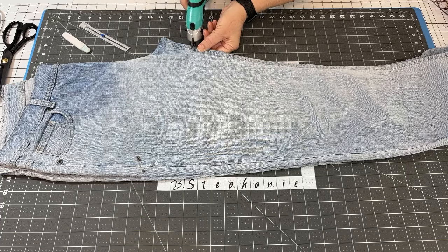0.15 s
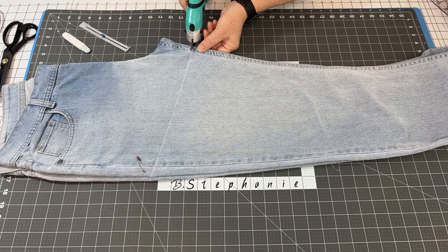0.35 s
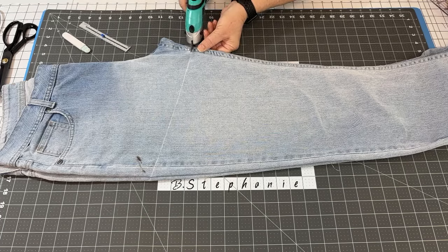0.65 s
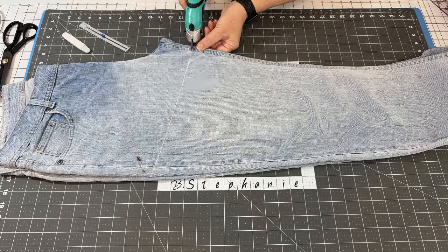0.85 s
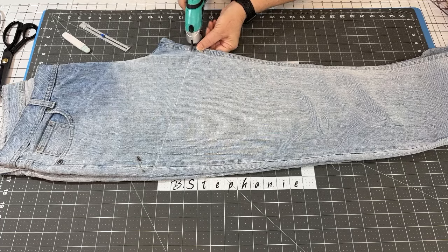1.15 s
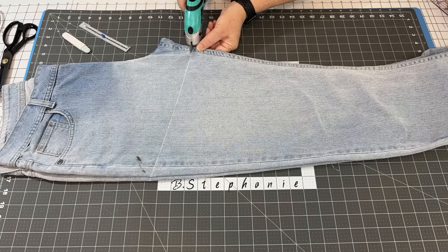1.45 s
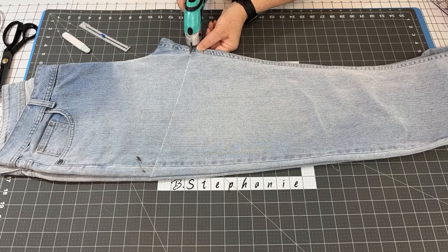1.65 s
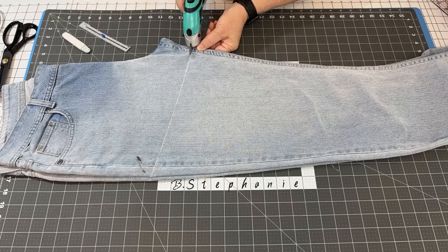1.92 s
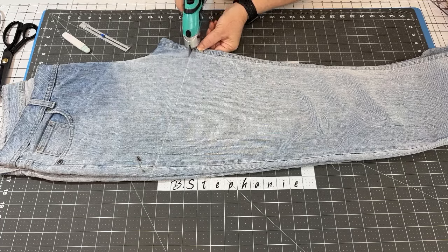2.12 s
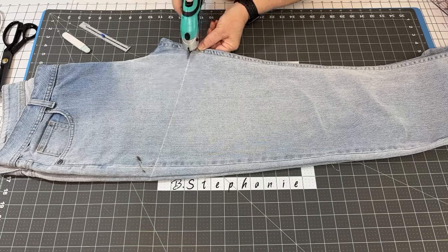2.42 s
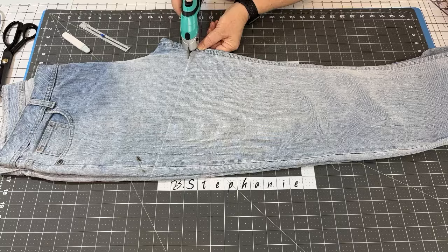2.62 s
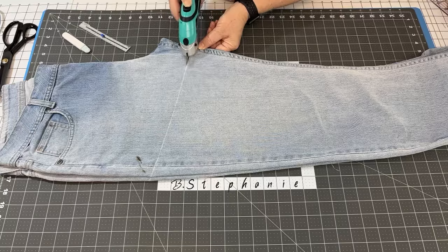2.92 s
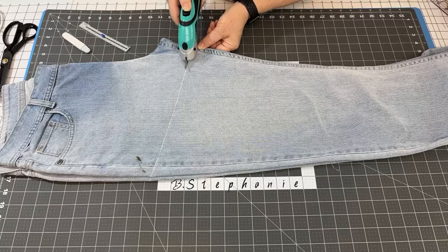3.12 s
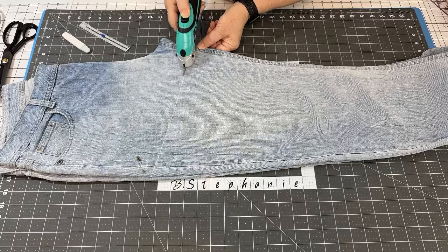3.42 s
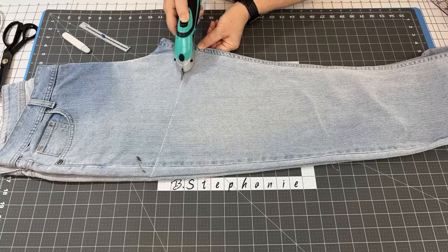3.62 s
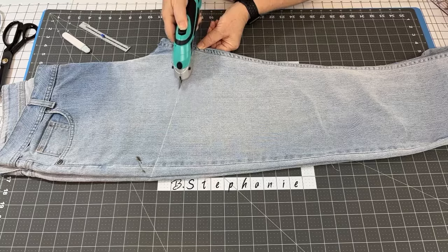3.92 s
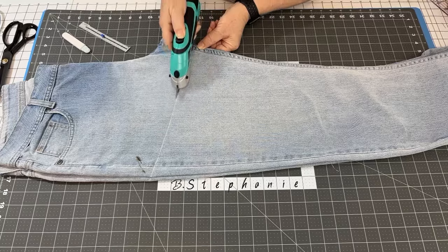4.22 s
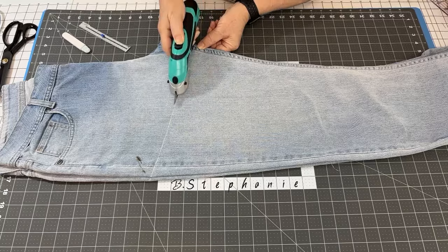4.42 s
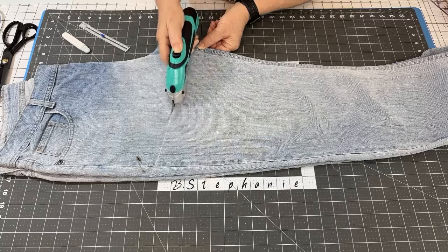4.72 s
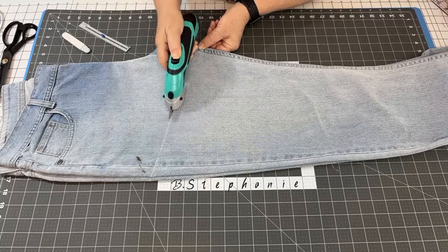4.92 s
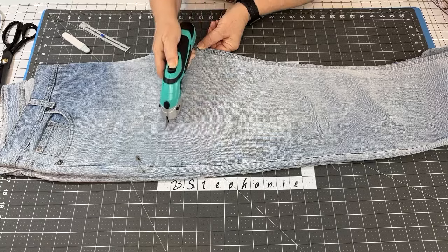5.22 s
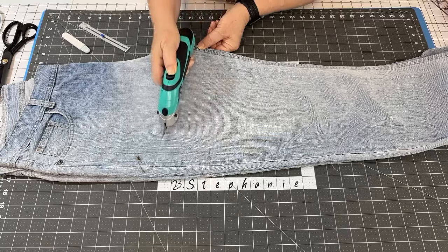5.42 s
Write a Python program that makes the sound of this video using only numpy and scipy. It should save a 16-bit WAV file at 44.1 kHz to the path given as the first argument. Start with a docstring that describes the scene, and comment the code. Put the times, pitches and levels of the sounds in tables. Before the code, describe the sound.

A handheld motor cutter buzzes and rattles through a jeans seam, then runs on with a rougher, hissing rasp across flatter cloth.

```python
"""A table in a quiet room: small cordless electric scissors cut denim, heard by one microphone.
A low room rumble lies behind, and a short room tail follows the clatter, weaker than the direct sound.
A motor swings the blade once a turn: the housing hums as sines on orders of the shaft, the linkage knocks as
filtered clicks at slowly sliding places in the turn, and blade and cloth rasp as noise that flares after contacts.
The thick seam slows the motor and cleans the tone; pings, snaps and scrapes are shaped noise and pulses."""
import sys
import numpy as np
from scipy import signal
from scipy.fft import rfft, irfft
from scipy.io import wavfile
from scipy.ndimage import uniform_filter1d

SR = 44100
rng = np.random.default_rng(int(sys.argv[2]) if len(sys.argv) > 2 else 0)


def to_wav(s):
    """Save 16-bit WAV."""
    ch = np.atleast_2d(s).T  # columns
    pcm = np.round(np.clip(ch, -1, 1) * 32767)  # PCM
    wavfile.write(sys.argv[1], SR, pcm.astype(np.int16))


N = 245195

# spectrum of the low room noise: pitch_hz, relative_level_db
RUMBLE_COLOUR = [(12, -22), (22, 3), (33, -7), (60, -1.5), (104, 1), (150, -2.5), (172, -15), (199, -7.5),
                 (280, -27.5), (360, -31)]
# shaft speed, slowed by the seam and freed when the blade backs off: time_s, speed_turns_per_s
SHAFT_SPEED = [(0.0, 127.1), (0.05, 134.7), (0.09, 152.7), (0.23, 158.6), (0.39, 154.3), (0.47, 149.1),
               (0.85, 152.1), (0.91, 161.8), (1.04, 162.2), (1.12, 153.1), (1.28, 149.3), (1.48, 152.7),
               (1.75, 152.5), (1.91, 152), (2.09, 152.8), (2.18, 156.6), (2.36, 161.8), (2.43, 160.5),
               (2.54, 164.9), (2.69, 164.5), (2.78, 158.8), (2.89, 161.2), (3.08, 159.3), (4.1, 158.3),
               (4.35, 160.6), (4.8, 161.6), (5.02, 161.5), (5.2, 160.3), (5.56, 161.1)]
# where the blade works: time_s, place (0 short of the cloth, 1 in the seam, 2 backed off,
# 3 entering flat cloth, 4 far across it; values between two places blend them)
BLADE_PLACE = [(0, 0.84), (.38, 0.59), (.47, 1.66), (.85, 2.57), (.9, 2.27), (1.04, 2.5), (1.1, 1.34),
               (2.12, 0.98), (2.3, 2.77), (2.45, 2.63), (2.5, 2.27), (2.68, 2.2), (2.74, 2.58), (4.1, 3.2),
               (4.5, 3.74), (5.56, 4.28)]
# effort of the cut: time_s, housing_hum_db, clatter_of_linkage_and_blade_db (before the room),
# rasp_share of the clatter's power (0-1)
WORK_LEVELS = [(0.0, -44, -32, 1), (0.08, -25, -26.5, 0.4), (0.14, -23, -26.5, 0), (0.24, -24, -25.5, 0),
               (0.36, -26.5, -25.5, 0.6), (0.45, -26, -25, 0.12), (0.79, -23.5, -23, 0.13),
               (0.89, -28.5, -28.5, .3), (1.02, -27.5, -27, .3), (1.1, -23, -24, 0.21),
               (1.3, -25.5, -24, .12), (1.57, -23.5, -23.5, .03), (2.0, -24, -24, 0.09),
               (2.2, -26, -23.5, 0.28), (2.42, -26, -25.5, 0.7), (2.5, -30.5, -26.5, .3),
               (2.64, -31.5, -24, 0.23), (2.74, -27.5, -24.5, .75), (2.95, -25.5, -24.5, 0.22),
               (3.3, -27, -24, 0.81), (4.1, -27.5, -23, 0.87), (4.5, -29.5, -23.5, 1),
               (4.8, -27.5, -23.5, 0.71), (5.26, -27.5, -22.5, 0.8), (5.38, -30.5, -24, 0.67),
               (5.56, -27.5, -22.5, 0.88)]
# balance of the housing hum: shaft_order, then relative_level_db at each of the five blade places
HUM_ORDERS = [(2, -18, -17.5, -16, -21.5, -25.5), (3, -17, -6, -14, -7.5, -13),
              (4, -5, -11.5, -6, -9, -10.5), (5, -26, -2, -1, -15.5, -14), (6, 2, -11, -5, -11, -13),
              (7, -24, -5.5, -8.5, -11.5, -15), (8, -12, -14.5, -11.5, -13.5, -9),
              (9, -10, -9.5, -9.5, -4.5, -16.5), (10, -6, -16, -5, -33.5, -29),
              (11, -15, -13.5, -10, -17, -16.5), (12, -5, -17, -11, -12.5, -9.5),
              (13, -32, -13.5, -14, -7.5, -11), (14, -33, -9, -11, -11.5, -13),
              (15, -27, -15.5, -12.5, -24, -13), (16, -32, -17.5, -17, -13, -10),
              (17, -29, -16.5, -7.5, -24, -17), (18, -13, -15, -20.5, -19.5, -10.5),
              (19, -24, -18.5, -16, -13, -10), (20, -1, -21, -6.5, -18, -6)]
# single orders that sing out for a while: start_s, end_s, shaft_order, level_db
SINGING_ORDERS = [(0.16, 0.26, 8, -26.5), (0.305, 0.438, 5, -28.5), (0.449, 0.619, 11, -32),
                  (.7, 0.883, 7, -28.5), (0.701, 0.837, 21, -37), (0.696, 0.817, 28, -33),
                  (1.15, 1.27, 7, -29.5), (1.27, 1.42, 21, -34), (1.516, 2.092, 27, -35),
                  (1.7, 2.106, 28, -34), (1.75, 2.066, 29, -34), (1.791, 2.089, 30, -31),
                  (2.01, 2.299, 6, -32), (2.153, 2.4, 13, -35), (2.55, 2.69, 5, -30),
                  (2.549, 2.742, 8, -33), (2.194, 2.31, 25, -29), (2.55, 2.66, 20, -33),
                  (2.73, 3.416, 9, -29.5), (2.858, 3.01, 25, -31.5), (2.93, 3.111, 6, -32.5),
                  (3.6, 4.361, 8, -32.5), (4.641, 5.17, 19, -32), (4.851, 5.56, 12, -34.5),
                  (5.2, 5.562, 8, -35.5), (5.3, 5.413, 25, -34), (5.329, 5.565, 14, -33.5),
                  (5.33, 5.56, 16, -36)]
# the two blade reversals: place_in_turn (0-1), relative_strength_db
BLADE_REVERSALS = [(.2, -1), (.8, -13)]
# spectrum of a linkage knock: pitch_hz, relative_level_db
KNOCK_COLOUR = [(2400, -20), (3300, -2.5), (3900, -1), (4500, 0), (5200, -3.5), (6000, -5.5), (7000, -4),
                (8300, -8.5), (9000, -14.5), (12000, -15), (15500, -26)]
# spectrum of the cloth scuff: pitch_hz, relative_level_db
SCUFF_COLOUR = [(150, -43), (300, -12.5), (450, -8), (800, 1), (1300, 2), (2100, -7), (2600, -40),
                (4000, -22)]
# spectrum of the blade rasp in the seam: pitch_hz, relative_level_db
RASP_SEAM_COLOUR = [(1500, -23), (2400, -2.5), (3200, 1), (4400, 4), (5500, 1), (8200, -1), (9000, -11.5),
                    (12300, -10), (14000, -16), (15700, -32)]
# spectrum of the blade rasp on flat cloth: pitch_hz, relative_level_db
RASP_FLAT_COLOUR = [(1500, -16), (2400, -2), (3000, 3), (4200, 1.5), (6000, -1), (8400, -3.5), (9000, -12),
                    (12300, -13), (14000, -18), (15700, -22)]
# ping of the unloaded blade until it meets the cloth: time_s, level_db (before the room)
PING_LEVEL = [(0, -35), (.06, -30), (.36, -26), (.44, -52), (5.56, -58)]
# spectrum of a ping: pitch_hz, relative_level_db
PING_COLOUR = [(5500, -17), (7300, -5), (8000, 0.5), (8700, -4), (9300, -24), (12000, -19), (15500, -23)]
# rough scrapes as the blade bites in or pulls free: centre_s, length_s, peak_level_db (before the room)
BLADE_SCRAPES = [(0.043, 0.028, -25.5), (.42, 0.046, -41), (0.867, 0.037, -30), (1.08, 0.067, -37),
                 (2.135, .04, -32), (2.204, 0.027, -34), (2.433, 0.027, -31.5), (2.7, 0.036, -29),
                 (3.08, .03, -38), (5.278, 0.034, -33)]
# spectrum of a scrape: pitch_hz, relative_level_db
SCRAPE_COLOUR = [(300, -10), (700, -8), (1400, 4), (2500, -3.5), (4500, -16), (8000, -29), (12000, -27)]
# blades snapping through threads at each reversal: time_s, level_db (before the room)
SNAP_LEVEL = [(0, -45), (2.1, -44), (2.75, -34), (3.6, -32), (4.6, -31), (5.56, -31)]
# spectrum of a snap: pitch_hz, relative_level_db
SNAP_COLOUR = [(700, -35), (1500, 6.5), (2500, -1.5), (4000, -6.5), (6000, -17), (9000, -32), (14000, -31)]

RUMBLE_DB = -37.5
EDGE_HZ = 15750  # top of the recorder's band
ON_S = 0.0078  # the trigger closes
HUNTING, HUNTING_HZ = .0025, 5  # on flat cloth the speed hunts by this share (rms), this often
BITE, BITE_SPREAD = 0.48, 1.4  # share of rasp that a scrape adds, over this many times its length
UNEVEN, UNEVEN_HZ = 0.15, 2.7  # on flat cloth the share of rasp wanders this much (rms), this often
SCUFF_DB, SCUFF_SLOPE = -37.5, 1.2  # scuff at full rasp; times faster in dB it falls with the rasp share
WANDER_DB, WANDER_HZ = 0.17, 18  # knocks and blade rasp swell and sink this much (rms), this often
PATCHY_DB, PATCHY_HZ = 2.5, 9  # the scuff comes in patches as the cloth drags (rms)
BREAK_UP = 1.6  # added to the hum's waver factor at full rasp


def gain_of(db):
    """Amplitude gain of a level in dB."""
    return 10 ** (np.asarray(db) / 20)


def evened(x):
    """The signal brought to rms 1."""
    return x / np.sqrt(np.mean(x ** 2) + 1e-20)


def curve(rows, column=1):
    """One column of a table, at every sample."""
    rows = np.array(rows, float)
    return np.interp(np.arange(N) / SR, rows[:, 0], rows[:, column])


def colour(x, points):
    """Causal filter with the given spectrum, brought to rms 1: the phase follows from the log gain."""
    f, db = np.transpose(points)
    hz = abs(np.fft.fftfreq(8192, 1 / SR))
    level_db = np.interp(np.log(hz + 1), np.log(f + 1), db)
    log_gain = np.log(gain_of(np.maximum(level_db, -100)))
    spectrum = np.exp(np.conj(signal.hilbert(log_gain)))
    taps = np.fft.ifft(spectrum).real[:4096]
    return evened(signal.oaconvolve(x, taps)[:N])


def drift(rate_hz, count):
    """Slow chance: rows of smooth noise of rms 1 that change about rate_hz times a second."""
    steps = N // 128 + 2
    rough = rng.standard_normal((count, steps))
    lowpass = 1 / (1 + (np.fft.rfftfreq(steps, 128 / SR) / rate_hz) ** 2)
    smooth = irfft(rfft(rough) * lowpass, steps)
    return np.array([np.interp(np.arange(N) / 128, np.arange(steps), evened(row)) for row in smooth])


def rumble():
    """Low room noise: steady random pressure with a low-pitched spectrum."""
    return gain_of(RUMBLE_DB) * colour(rng.standard_normal(N), RUMBLE_COLOUR)


def room(x):
    """Reflections as sparse taps of random sign that die away by 60 dB in 0.27 s."""
    at = np.arange(150, 9000, 20) + rng.integers(0, 20, 443)
    tail = np.zeros(9100)
    tail[at] = rng.choice([-1., 1.], len(at)) * gain_of(-60 * at / SR / 0.27)
    return signal.oaconvolve(x, tail / np.linalg.norm(tail))[:N]


def on_flat():
    """0 in and before the seam, 1 once the blade runs on flat cloth."""
    return np.clip((np.arange(N) / SR - 2.7) / 0.1485, 0, 1)


def shaft():
    """Turns made so far: the summed speed, which trembles a little and hunts on flat cloth."""
    tremble = 0.00204 * drift(30.7, count=1)[0]
    hunting = HUNTING * on_flat() * drift(HUNTING_HZ, count=1)[0]
    return np.cumsum(curve(SHAFT_SPEED) * (1 + tremble + hunting)) / SR


def contacts(count=24):
    """Place in the turn and slowly changing strength of the two reversals and many other contacts."""
    others = np.column_stack([rng.random(count), np.full(count, -7.5)])
    place, db = np.vstack([BLADE_REVERSALS, others]).T
    return place, gain_of(db[:, None] + 2.3 * drift(3.5, count=len(place)))


def clicks(turns, at, size, late, uneven_db):
    """One click a turn, placed between two samples by a short sinc; late is its rms scatter in samples."""
    train, lag = np.zeros(N + 40), np.arange(-16, 17)
    when = np.interp(np.arange(int(turns[-1])) + at, turns, np.arange(N))
    when = np.clip(when + late * rng.standard_normal(len(when)), 20, N - 1)
    whole = when.astype(int)
    blow = size[whole] * gain_of(uneven_db * rng.standard_normal(len(when)))
    pulse = np.sinc(lag - (when - whole)[:, None]) * np.hanning(33)
    np.add.at(train, whole[:, None] + lag, blow[:, None] * pulse)
    return train[:N]


def clatter_gains():
    """Gains of knocks, rasp and scuff: the rougher the cut, the more the rasp takes over from the knocks."""
    t = np.arange(N) / SR
    bites = sum(np.exp(-((t - s) / (BITE_SPREAD * length)) ** 2 * 2) for s, length, _ in BLADE_SCRAPES)
    wander = UNEVEN * on_flat() * drift(UNEVEN_HZ, count=1)[0]
    share = np.clip(curve(WORK_LEVELS, column=3) + BITE * bites + wander, .01, .97)
    whole = gain_of(curve(WORK_LEVELS, column=2) + WANDER_DB * drift(WANDER_HZ, count=1)[0])
    patches = gain_of(SCUFF_DB + PATCHY_DB * drift(PATCHY_HZ, count=1)[0])
    return whole * np.sqrt(1 - share), whole * np.sqrt(share), patches * share ** (SCUFF_SLOPE / 2)


def ping(turns):
    """The blade rings as a short bright noise burst at the second reversal, over a faint steady floor."""
    decay = np.exp(-((turns - BLADE_REVERSALS[1][0]) % 1) / 0.17)  # in turns
    burst = rng.standard_normal(N) * (0.097 + decay)
    return gain_of(curve(PING_LEVEL)) * colour(burst, PING_COLOUR)


def scrapes():
    """The blade biting in or pulling free: short swells of coarse noise."""
    t = np.arange(N) / SR
    swell = sum(gain_of(db) * np.exp(-((t - s) / length) ** 2 * 2) for s, length, db in BLADE_SCRAPES)
    coarse = rng.standard_normal(N) * gain_of(4.3 * drift(250, count=1)[0])
    return swell * colour(coarse, SCRAPE_COLOUR)


def snaps(turns):
    """Threads give way in sharp uneven pulses, two a turn, that come and go with the weave."""
    grip = gain_of(2.2 * drift(4, count=len(BLADE_REVERSALS)))
    train = sum(clicks(turns, at, size, late=.9, uneven_db=1.5)
                for (at, _), size in zip(BLADE_REVERSALS, grip))
    return gain_of(curve(SNAP_LEVEL)) * colour(train, SNAP_COLOUR)


def rasp(turns, place, strength, blade_gain, cloth_gain):
    """Steady friction noise that also flares after each contact and dies within a small part of the turn."""
    flare = sum(size * np.exp(-((turns - at) % 1) / 0.026) for at, size in zip(place, strength))
    flare = 3.2 + flare / uniform_filter1d(flare, 2000)  # steady part plus flares
    flare *= gain_of(0.49 * drift(17, count=1)[0])  # the weave is uneven
    noise = rng.standard_normal(N) * flare
    flat = np.clip(curve(BLADE_PLACE) - 2, 0, 1)
    blade = (1 - flat) * colour(noise, RASP_SEAM_COLOUR) + flat * colour(noise, RASP_FLAT_COLOUR)
    cloth = colour(rng.standard_normal(N) * flare, SCUFF_COLOUR)
    return blade_gain * blade + cloth_gain * cloth


def knocks(turns, place, strength, gain):
    """The linkage: each contact clicks once a turn while its place slides slowly."""
    # rms slide in turns at the five blade places: the seam steadies the blade
    held = np.interp(curve(BLADE_PLACE), range(5), [0.0071, 0.0026, 0.0075, 0.0056, 0.01])
    creep = held * drift(3.1, count=len(place))
    train = sum(rng.choice([-1, 1]) * clicks(turns + slide, at, size, late=0.27, uneven_db=-0.4)
                for at, size, slide in zip(place, strength, creep))
    loud = np.sqrt(np.mean(strength ** 2, 0))
    return gain * colour(train / loud, KNOCK_COLOUR)


def hum(turns, rough):
    """Housing: shaft orders as sines that wander in level; one swells while it sits on a resonance."""
    t, place = np.arange(N) / SR, curve(BLADE_PLACE)
    shares = {round(order): gain_of(np.interp(place, range(5), db)) for order, *db in HUM_ORDERS}
    whole = gain_of(curve(WORK_LEVELS, column=1)) / np.sqrt(sum(share ** 2 for share in shares.values()))
    level = {order: whole * share for order, share in shares.items()}
    for start, end, order, db in SINGING_ORDERS:
        inside = np.clip(np.minimum(t - start, end - t) / .07 + .5, 0, 1)  # 70 ms edges
        swell = np.sin(np.pi / 2 * inside) ** 2
        level[round(order)] = np.maximum(level.get(round(order), 0), gain_of(db) * swell)
    slow, quick = drift(8.7, count=len(level)), drift(27, count=len(level))
    waver_factor = 0.78 + BREAK_UP * rough
    out = np.zeros(N)
    for k, order in enumerate(level):
        waver = 1.1 * slow[k] + .06 * order * quick[k]  # high orders flutter more
        lag = 0.28 * rng.standard_normal()  # the orders loosely line up at the second reversal
        cycles = order * (turns - BLADE_REVERSALS[1][0]) + lag
        sine = np.sqrt(2) * np.cos(2 * np.pi * cycles)
        out += level[order] * gain_of(waver * waver_factor) * sine
    return out


def scene():
    """One microphone: both channels carry the same sound."""
    turns = shaft()
    place, strength = contacts()
    running = np.clip((np.arange(N) / SR - ON_S) / 0.001, 0, 1)
    knock_gain, blade_gain, cloth_gain = clatter_gains()
    linkage = knocks(turns, place, strength, knock_gain) + ping(turns)
    cutting = rasp(turns, place, strength, blade_gain, cloth_gain) + snaps(turns) + scrapes()
    rough = blade_gain ** 2 / (blade_gain ** 2 + knock_gain ** 2)
    clatter = running * (linkage + cutting)
    clatter = 0.93 * clatter + gain_of(-6.5) * room(clatter)  # direct sound and room tail
    return np.tile(running * hum(turns, rough) + clatter + rumble(), (2, 1))


def record(dry):
    """The band limit of the recorder."""
    lowpass = signal.firwin(511, EDGE_HZ, window=("kaiser", 9), fs=SR)
    return signal.oaconvolve(dry, lowpass[None], "same")


dry = scene()
out = record(dry)
to_wav(out)
```